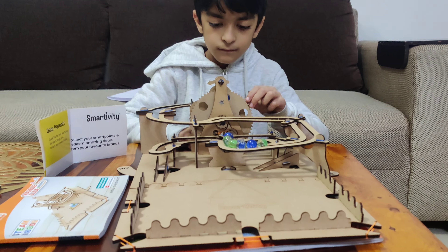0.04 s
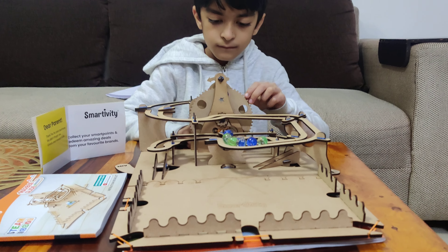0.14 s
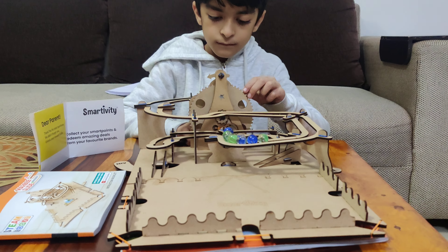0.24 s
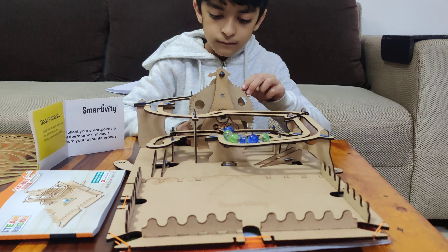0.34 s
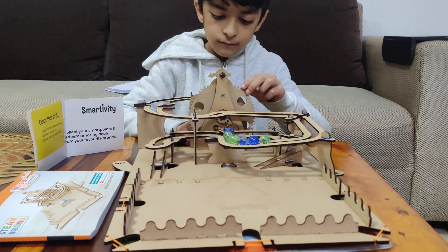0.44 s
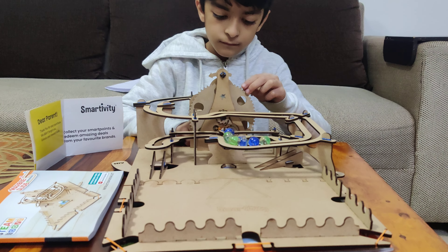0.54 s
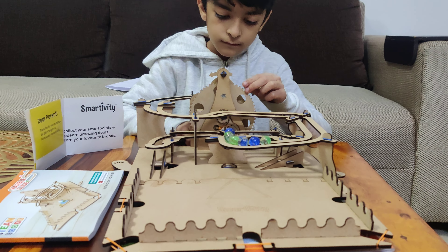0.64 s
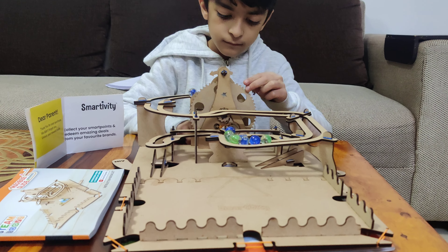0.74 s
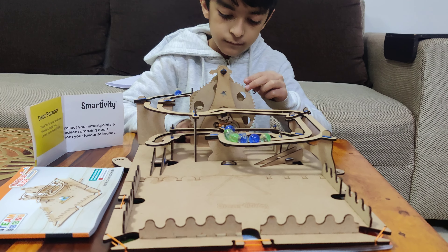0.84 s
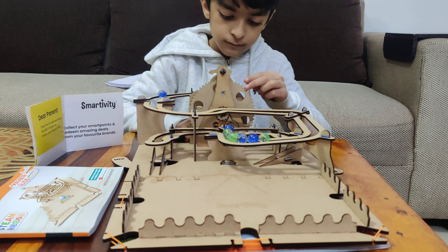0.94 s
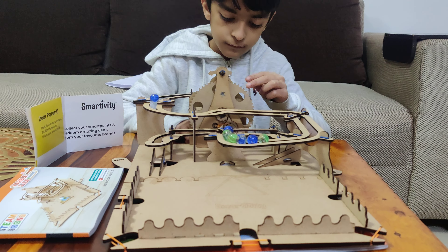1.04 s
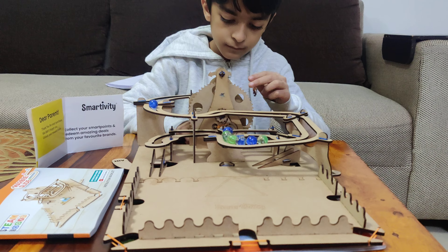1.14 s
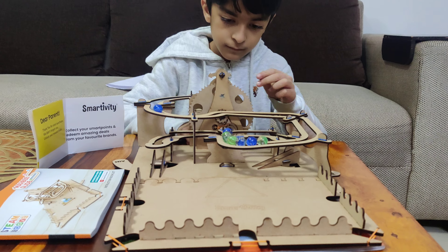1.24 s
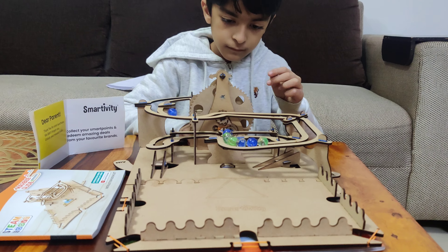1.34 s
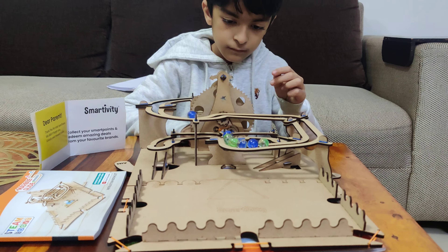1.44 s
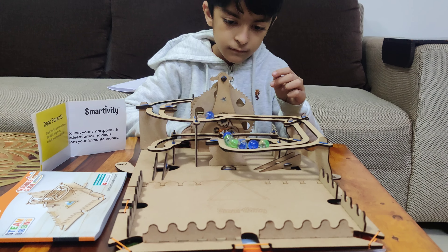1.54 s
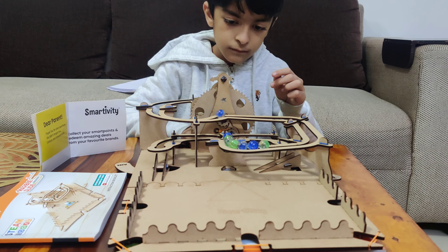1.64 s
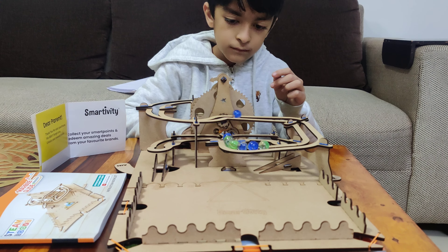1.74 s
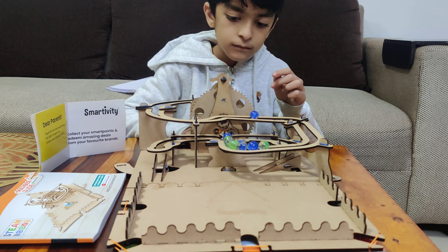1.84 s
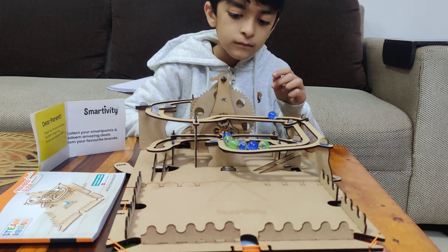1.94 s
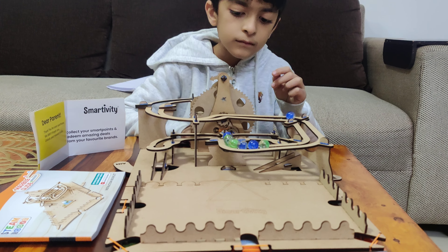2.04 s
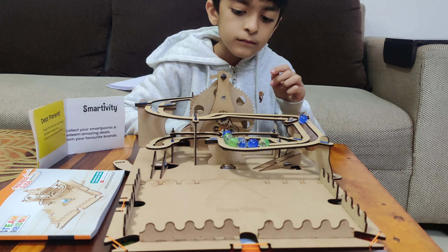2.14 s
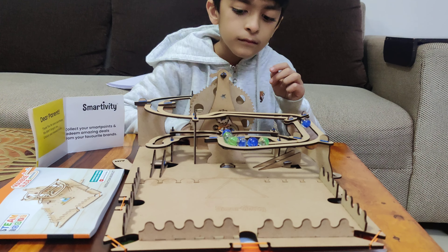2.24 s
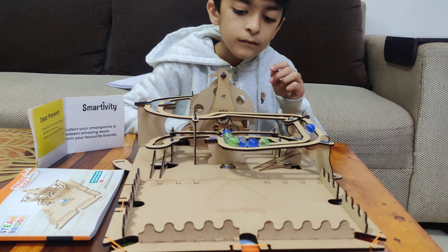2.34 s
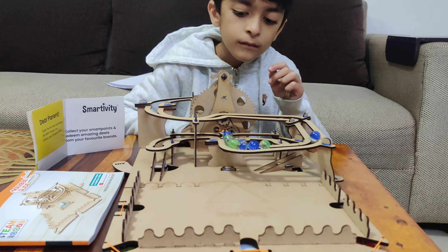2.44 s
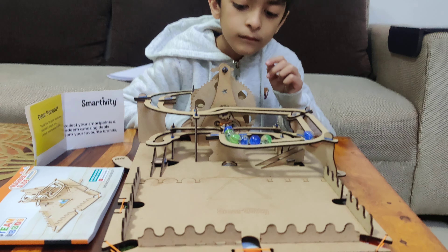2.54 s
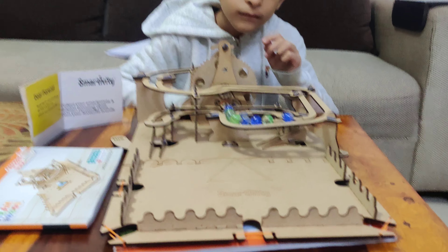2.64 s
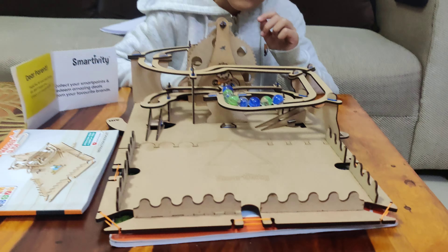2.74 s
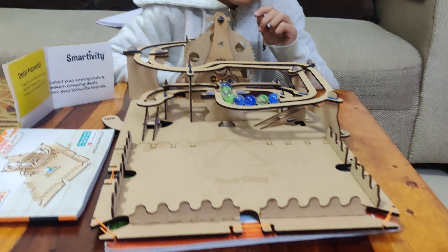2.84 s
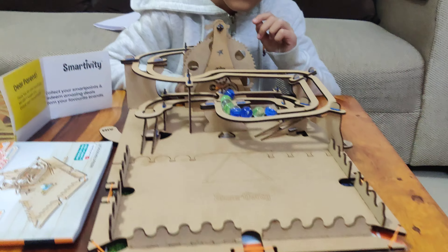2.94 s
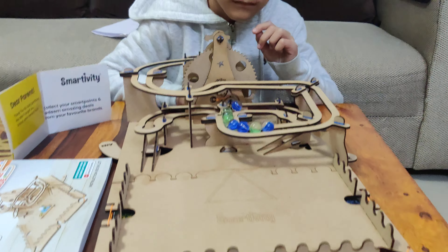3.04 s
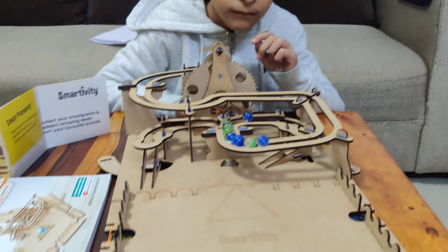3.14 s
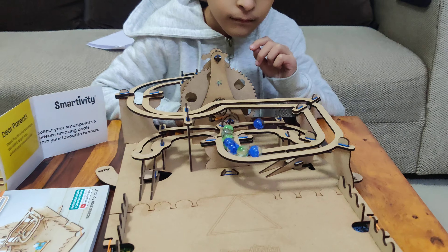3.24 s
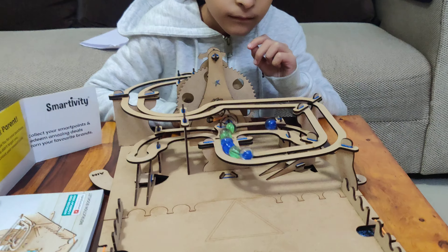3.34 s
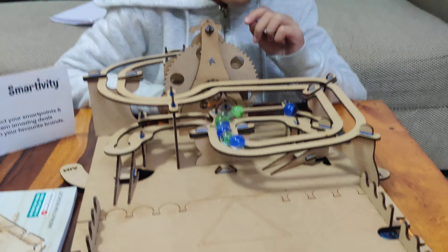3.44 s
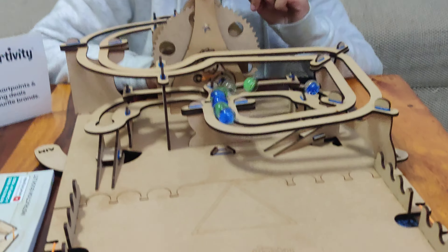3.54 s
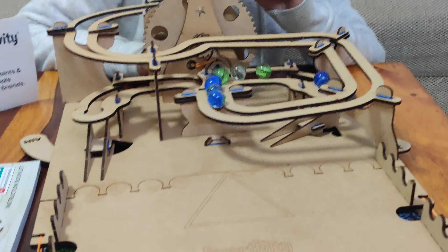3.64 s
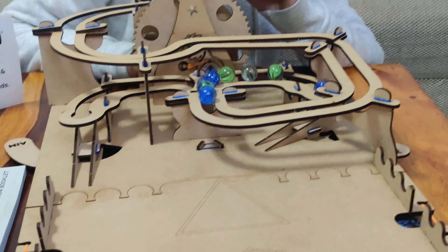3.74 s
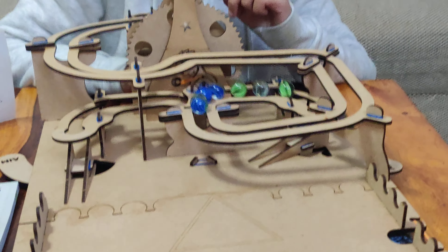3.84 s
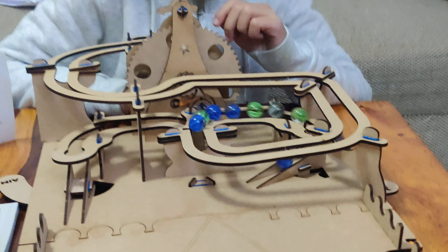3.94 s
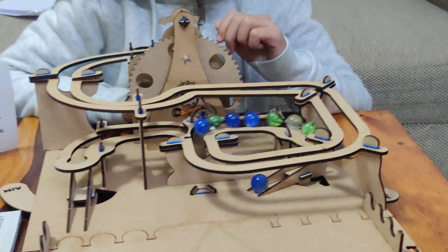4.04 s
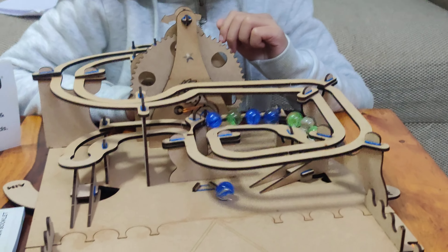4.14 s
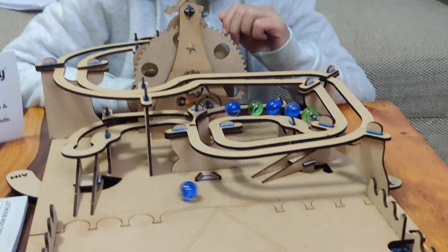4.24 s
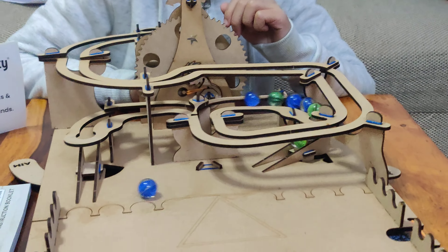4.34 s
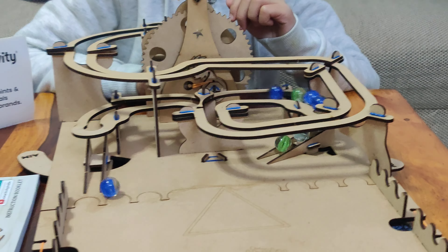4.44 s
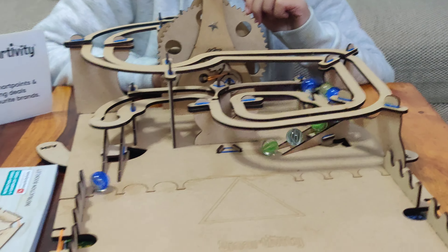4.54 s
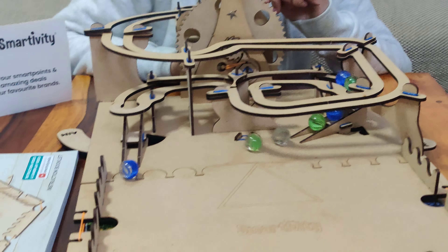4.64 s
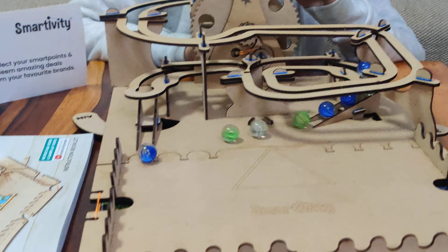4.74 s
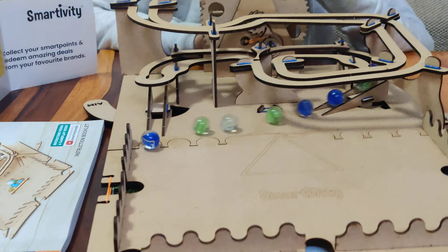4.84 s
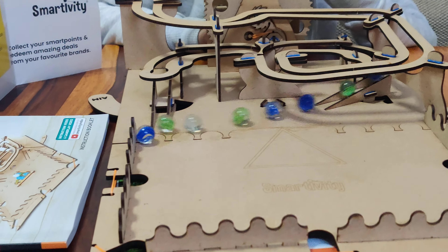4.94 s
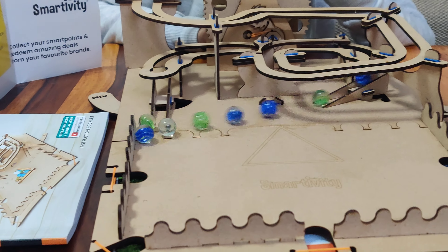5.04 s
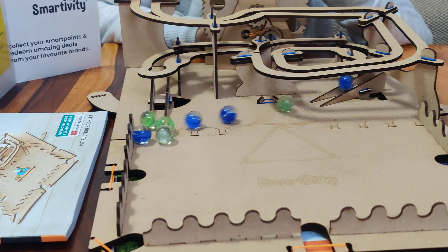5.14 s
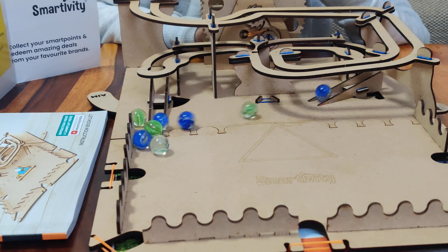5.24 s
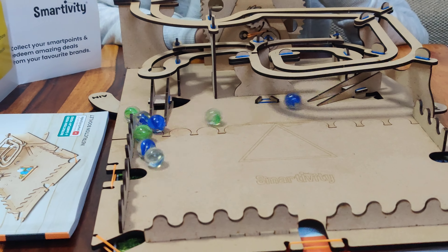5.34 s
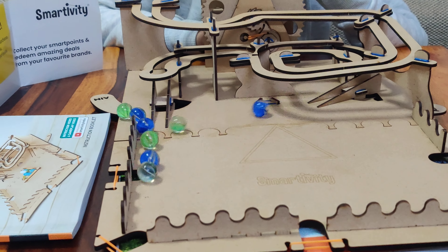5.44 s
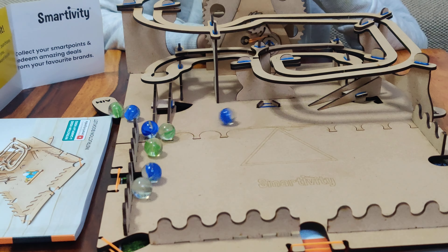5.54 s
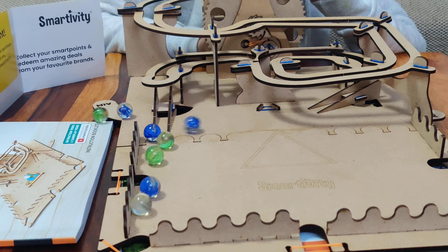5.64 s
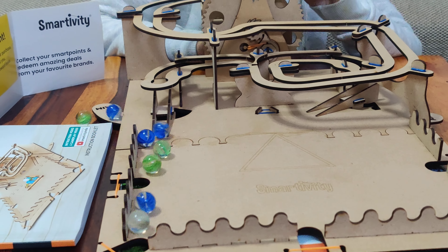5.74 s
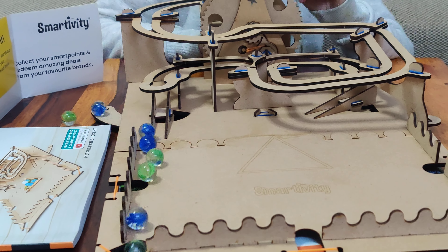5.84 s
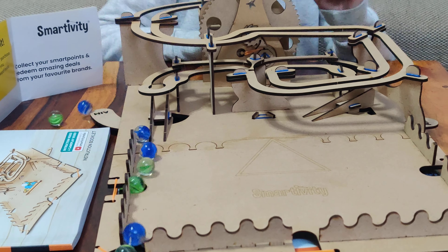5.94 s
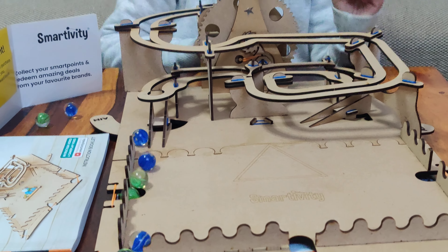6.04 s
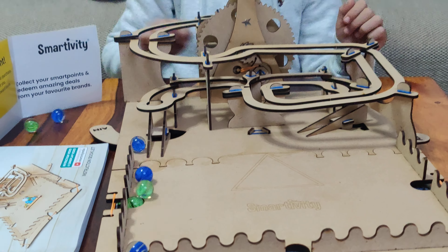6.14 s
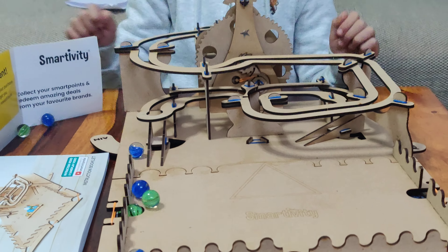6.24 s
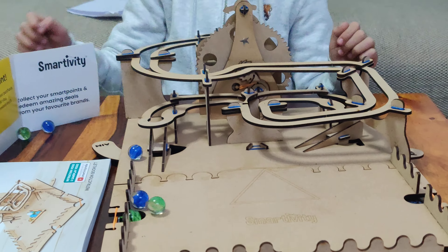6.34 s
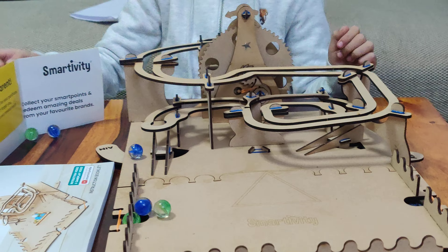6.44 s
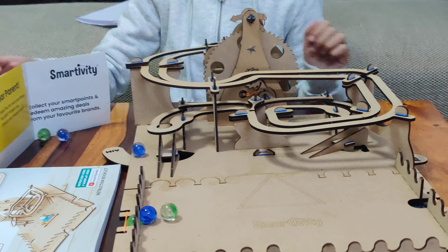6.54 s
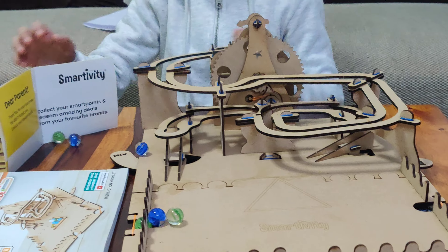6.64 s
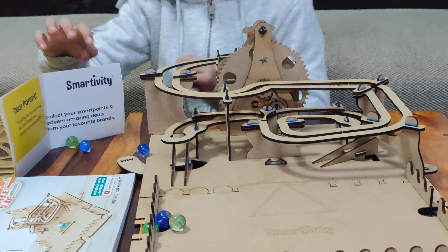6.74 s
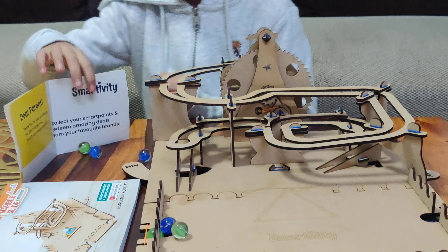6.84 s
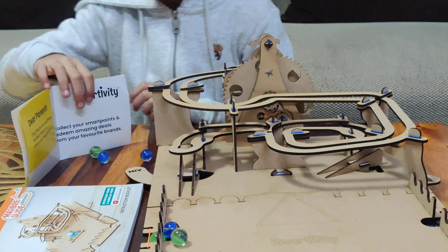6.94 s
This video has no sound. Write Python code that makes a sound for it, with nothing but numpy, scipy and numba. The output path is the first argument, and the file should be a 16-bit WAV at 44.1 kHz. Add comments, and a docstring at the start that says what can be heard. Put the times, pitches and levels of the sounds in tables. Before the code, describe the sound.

Quiet marble rolling on a wooden toy run builds into loud drops, rattling and glassy clicks on a tray, ending with spilled marbles bouncing on a tabletop.

```python
"""Wooden marble run

A lever knocks, one glass marble rolls down the rails and frees a queue of others. They drop one by one
onto a thin fibreboard tray, roll across it and click together; a few knock its edge and spill onto the table.
Every contact is a short ring of the struck body: a crowd of damped modes, on some bodies with single modes.
Rolling is random tiny bumps through such rings, louder with speed. A living room answers over a quiet hush.
"""
import sys
import numpy as np
from scipy import signal
from scipy.fft import rfft, irfft
from scipy.io import wavfile
from scipy.ndimage import uniform_filter1d
from numba import njit

SR = 44100
rng = np.random.default_rng(int(sys.argv[2]) if len(sys.argv) > 2 else 0)


def waveform_to_disk(signal):
    """Save audio, clipped to [-1, 1], as 16-bit WAV at the path in sys.argv[1]."""
    frames = np.transpose(np.atleast_2d(signal))
    scaled = np.clip(frames, -1, 1) * 32767
    samples = np.round(scaled).astype(np.int16)
    wavfile.write(sys.argv[1], SR, samples)


N = 308259
TIME = np.arange(N) / SR
TOP_HZ = 16200
BRAKE_S = 0.12  # a bend or a wall takes the speed away in this time
ENTER_S = 0.062  # a marble settles into rolling in this time

# In all tables: hit level = first 4 ms, before the mix; colour levels = relative spectrum of a body.
# rolling on rails and table top: [f/Hz, level/dB]
HARD_ROLL_COLOUR = [(168, -4), (280, -11), (400, -11), (580, -12.5), (1000, 0), (1350, -6), (2600, -0.5),
                    (4200, -17.5), (5300, -9), (6700, -26), (14000, -45.5)]


def undb(db):
    """Decibels to gain."""
    return 10 ** (np.asarray(db) / 20)


def unit(x):
    """Scale to an rms of 1."""
    return x / np.sqrt(np.mean(x ** 2))


def unit_energy(x):
    """Scale a response to a mean energy of 1 per channel."""
    return unit(x) / np.sqrt(x.shape[-1])


def on_log_axis(points, hz):
    """Interpolate (f/Hz, value) points over log frequency."""
    at_hz, value = np.transpose(points)
    return np.interp(np.log(hz + 1), np.log(at_hz), value)


def band(x, lo_hz, hi_hz, order=2):
    """Butterworth band-pass."""
    return signal.sosfilt(signal.butter(order, [lo_hz, hi_hz], "band", fs=SR, output="sos"), x)


def convolve(x, response):
    """Filter by a response, keeping the length."""
    return signal.fftconvolve(np.atleast_2d(x), np.atleast_2d(response), axes=1)[:, :x.shape[-1]]


def hardness(hz, tilt_db):
    """A harder, shorter contact feeds more treble: dB at each frequency from a tilt in dB/octave."""
    return tilt_db * np.log2(np.clip(hz, 900, 12000) / 2500)


def colour(x, points, tilt_db=0, size=2048):
    """Minimum-phase filter with the given spectrum, tilted in dB/octave, falling below its first point."""
    hz = np.arange(size // 2 + 1) * SR / size
    db = on_log_axis(points, hz) + hardness(hz, tilt_db)
    below = np.minimum((hz + 10) / points[0][0], 1) ** 4
    # fold the cepstrum onto positive times: a causal response
    cepstrum = irfft(np.log(undb(db) * below))
    cepstrum[1:size // 2] *= 2
    cepstrum[size // 2 + 1:] = 0
    return convolve(x, irfft(np.exp(rfft(cepstrum))))


def two_ears(size, alike_hz):
    """Stereo noise: alike on both sides well below alike_hz, unrelated well above."""
    mid, side = rfft(rng.standard_normal((2, size)))
    likeness = 1 / (1 + (np.arange(len(mid)) * SR / size / alike_hz) ** 4)
    mid = mid * np.sqrt(1 + likeness)
    side = side * np.sqrt(1 - likeness)
    return irfft(np.array([mid + side, mid - side]), size)


def crowd(t60, alike_hz, size=4096):
    """Countless damped modes: noise that builds as waves cross the body, dies fast, broadly flat in spectrum."""
    t = np.arange(size) / SR
    build = 1 - np.exp(-t / (.03 * t60))
    decay = np.exp(-np.log(1000) * t / t60)
    burst = rfft(two_ears(size, alike_hz) * build * decay)
    broad = uniform_filter1d(np.mean(abs(burst) ** 2, axis=0), size=128)
    fade = (1 - t / t[-1]) ** 2
    return unit_energy(irfft(burst / np.sqrt(broad), size) * fade)


def ring(modes, tilt_db, alike_hz, size=4096):
    """Single damped modes; weights and pitches vary at random with the spot that is struck."""
    hz, db, t60 = np.transpose(modes)[:, :, None]
    t = np.arange(size) / SR
    weight, detune, lag = rng.standard_normal((3, len(modes), 1))
    decay = np.exp(-np.log(1000) * t / t60)
    swing = undb(db + 5 * weight + hardness(hz, tilt_db)) / np.sqrt(t60) * decay
    phase = 2 * np.pi * hz * (1 + .025 * detune) * t
    apart = lag * np.minimum((hz / alike_hz) ** 2, 2) / 2
    sides = [(swing * np.sin(phase + side * apart)).sum(axis=0) for side in (1, -1)]
    return unit_energy(np.array(sides))


def add(track, sound, s):
    """Mix a sound into a track at time s."""
    start = int(np.clip(s * SR, 0, N - 1))
    track[:, start:start + sound.shape[1]] += sound[:, :N - start]


def strikes(hits, points, t60, alike_hz, modes=None, modes_db=0, size=176):
    """Blows (t/s, level/dB, tilt/dB per octave) on one body: part of the ring is common, part new each time."""
    out = np.zeros((2, N))
    own = crowd(t60, alike_hz)
    for s, db, tilt_db in hits:
        blow = unit_energy(colour(0.9 * own + crowd(t60, alike_hz), points, tilt_db))
        if modes:
            blow = blow + undb(modes_db) * ring(modes, tilt_db, alike_hz)
        onset_rms = np.sqrt(np.mean(blow[:, :size] ** 2))  # first 4 ms
        add(out, blow * undb(db) / onset_rms, s)
    return out


def tilted(hits, tilt_db):
    """Give a set of blows one hardness of contact, in dB/octave."""
    return [(s, db, tilt_db) for s, db in hits]


def wander(rate):
    """Random levels held about 1 / rate s and smoothed, rms 1."""
    hold = int(SR / rate)
    levels = rng.standard_normal(2048)[np.arange(N) // hold % 2048]
    return unit(uniform_filter1d(levels, hold))


def rolling(hum_gain, crackle_gain, points, rate, spread_db, split_hz, lump_db, lump_rate, count=6):
    """Tiny bumps, rate a second per spot, shake the wood in lumps; the ring shifts as the marble travels."""
    wood = 0
    lumps = undb(lump_db * np.clip(wander(lump_rate), -2, 1.5))
    for spot in range(count):
        at = rng.random(N) < rate / SR
        size = undb(spread_db * np.minimum(rng.exponential(size=N), 3))
        bumps = at * rng.choice([-1, 1], N) * size
        nearness = (1 + np.cos(2 * np.pi * (2.3 * TIME + spot / count))) ** 2
        wood = wood + convolve(bumps * nearness * lumps, colour(crowd(0.027, 1600), points))
    hum = signal.sosfilt(signal.butter(4, split_hz, fs=SR, output="sos"), wood)
    crackle = band(wood, split_hz, TOP_HZ, order=4)
    return unit(hum) * hum_gain + unit(crackle) * crackle_gain


def speed(start, end, entry, slow_s):
    """A marble speeds up steadily, then slows to rest: share of its top speed."""
    return np.interp(TIME, [start, start + ENTER_S, end, end + slow_s], [0, entry, 1, 0])


def loudness(runs, slow_s, power):
    """Gain of rolling marbles: each a power of its speed, summed as energies."""
    energy = 0
    for start, end, entry, db, *_ in runs:
        energy = energy + (undb(db) * speed(start, end, entry, slow_s) ** power) ** 2
    return np.sqrt(energy)


def jostle(gain, rate, over_db, spread_db, tilt_db, count=120):
    """Chance knocks, about rate a second, centred over_db above a rolling gain: rows (s, dB, tilt)."""
    chance = rng.random((count, 3))
    times = np.cumsum(.3 + 1.4 * chance[:, 0]) / rate
    hits = []
    for s, (_, strength, hard) in zip(times, 2 * chance - 1):
        if s < TIME[-1] and gain[int(s * SR)] > 0:
            roll_db = 20 * np.log10(gain[int(s * SR)])
            hits.append((s, roll_db + over_db + spread_db * strength, tilt_db + 3 * hard))
    return hits


def bounces(s, flight_s, kept, db, fade_db, count=16):
    """Each flight is shorter by the same share, so hops shrink into a buzz, softer and duller: (s, dB, tilt)."""
    hops = []
    for k in range(count):
        hops.append((s, db - fade_db * k, 2 - 0.22 * k))  # tilt in dB/octave
        s += flight_s * kept ** k
    return [hop for hop in hops if hop[0] < TIME[-1]]


@njit
def moving_low_pass(x, edge_hz):
    """Two-pole state-variable low-pass whose edge moves every sample."""
    y, b, l = np.empty(len(x)), 0., 0.  # b, l: band and low states
    for i in range(len(x)):
        g = np.tan(np.pi * edge_hz[i] / SR)
        v = (b + g * (x[i] - l)) / (1 + g * (g + 1))
        y[i] = l + g * v
        b, l = 2 * v - b, 2 * y[i] - l
    return y


def hush():
    """Low rumble and faint hiss of the quiet room: stereo noise with a fixed spectrum."""
    # relative density: [f/Hz, level/dB per Hz]
    hush_density = [(25, -7.5), (60, 0.5), (125, -13.5), (340, -17), (960, -28), (2900, -31.5), (4100, -43),
                    (5200, -33.5), (6500, -42.5), (15500, -40.5)]
    hz = np.arange(N // 2 + 1) * SR / N
    noise = irfft(rfft(two_ears(N, 380)) * undb(on_log_axis(hush_density, hz)), N)
    return undb(-59) * unit(noise)


def lever():
    """The wooden release lever knocks and rebounds, softer each time: a dry clack around one damped mode."""
    # knocks on wood: [t/s, level/dB]
    lever_knocks = [(0.3422, -24), (0.3762, -27.5), (0.3932, -35)]
    # quickly damped modes: [f/Hz, level/dB]
    lever_body = [(170, -19), (300, -18), (520, -4.5), (850, -1.5), (1300, -7), (1650, -18), (5200, -34),
                  (15000, -47)]
    # nominal mode: [f/Hz, level/dB, t60/s]
    lever_mode = [(874, 0, .013)]
    rebound_dull_db = 3.5  # dB/octave per rebound
    hits = [(s, db, -rebound_dull_db * k) for k, (s, db) in enumerate(lever_knocks)]
    return strikes(hits, lever_body, t60=0.017, alike_hz=1940, modes=lever_mode, modes_db=0)


def rails():
    """Marbles roll down narrow rails, brighter with speed, each stretch at its pitch; ticks and joint knocks."""
    # stretches: [start/s, end/s, entry speed/share of final, final level/dB, resonance/Hz]
    stretches = [(0.572, 0.714, 0.25, -60, 900), (0.77, 1.125, 0.47, -56.5, 1940),
                 (1.234, 1.552, 1, -55.5, 1580), (1.606, 2.174, 0.41, -59.5, 1130),
                 (2.25, 2.936, 1, -66.5, 850), (3, 3.88, 0.14, -65.5, 1900)]
    # knocks at bends and joints: [t/s, level/dB]
    joint_knocks = [(1.2065, -33), (2.2195, -35.5), (2.2573, -49), (3.238, -42.5), (3.4112, -41),
                    (3.5585, -41), (3.583, -33.5), (3.6844, -37.5), (3.8059, -35.5)]
    # light, dry ticks of the thin rails: [t/s, level/dB]
    thin_ticks = [(1.5135, -46), (1.542, -41.5), (1.732, -48.5), (2.058, -45.5), (2.8832, -42),
                  (3.0825, -52.5), (3.1102, -41), (3.4748, -43), (3.6344, -40.5), (3.745, -46.5),
                  (3.7694, -38.5)]
    # quickly damped modes: [f/Hz, level/dB]
    rail_body = [(150, -17), (500, -4.5), (1000, 3.5), (1800, 1.5), (2700, 0.5), (3900, -11.5), (5300, -4),
                 (7000, -19.5), (10000, -26), (15000, -42)]
    slow_edge_hz, fast_edge_hz = 1000, 6440  # low-pass edge at rest and at full speed
    ring_db, ring_ratio = -0.5, 1.117  # stretch resonance: strength; edge to centre

    hum = loudness(stretches, BRAKE_S, power=0.16)
    crackle = undb(-4.5) * loudness(stretches, BRAKE_S, power=0.85)
    roll = rolling(hum, crackle, HARD_ROLL_COLOUR, rate=190, spread_db=5, split_hz=1174,
                   lump_db=2.5, lump_rate=55)
    paces = [speed(start, end, entry, BRAKE_S) for start, end, entry, *_ in stretches]
    rings = 0
    for pace, (*_, hz) in zip(paces, stretches):
        rings = rings + np.sqrt(pace) * band(roll, hz / ring_ratio, hz * ring_ratio, order=1)
    edge_hz = slow_edge_hz * (fast_edge_hz / slow_edge_hz) ** np.max(paces, axis=0)
    roll = np.array([moving_low_pass(side, edge_hz) for side in roll + undb(ring_db) * rings])

    grain = jostle(crackle, rate=26, over_db=-5.5, spread_db=10, tilt_db=0.5)
    last_stretch = loudness(stretches[-1:], BRAKE_S, power=0.93)
    queue = jostle(last_stretch, rate=26, over_db=9, spread_db=7.5, tilt_db=-1)
    knocks = strikes(tilted(joint_knocks, tilt_db=1.7), rail_body, t60=0.039, alike_hz=856)
    light = tilted(thin_ticks, tilt_db=-2) + grain + queue
    return roll + knocks + strikes(light, rail_body, t60=0.012, alike_hz=1510)


def hard_clicks():
    """Short, hard clicks with a broad hump, higher for a shorter contact."""
    # glass on glass, and marbles knocking the tray edge as they spill: [t/s, level/dB, hump/Hz]
    clicks = [(0.742, -57.5, 4940), (2.2192, -36.5, 5550), (2.784, -27, 10700), (3.1536, -58, 8140),
              (4.5072, -29, 5500), (4.6144, -20.5, 10100), (4.7093, -28, 5220), (4.8382, -21.5, 10880),
              (5.089, -17, 6800), (5.107, -25.5, 11200), (5.112, -18, 6200), (5.216, -27.5, 9700),
              (5.2847, -22.5, 7800), (5.2983, -26.5, 9700), (5.3924, -26.5, 10230), (5.412, -26.5, 5600),
              (5.423, -23, 6130), (5.5776, -17.5, 6060), (5.8064, -31.5, 9730), (5.8264, -21.5, 5400),
              (6.15, -35, 9530), (6.514, -51, 7800), (6.8564, -32.5, 5230)]
    # quickly damped modes: [f/Hz, level/dB]
    click_body = [(200, -13), (900, -1.5), (3700, -5), (5400, 1), (7500, -6.5), (12500, -7.5),
                  (16000, -15.5)]
    out = np.zeros((2, N))
    hz = np.geomspace(200, TOP_HZ, num=60)
    for s, db, contact_hz in clicks:
        hump_db = 11 * np.exp(-(np.log2(hz / contact_hz) / .45) ** 2)
        points = np.column_stack([hz, on_log_axis(click_body, hz) + hump_db])
        out += strikes([(s, db, 0)], points, t60=0.016, alike_hz=900)
    return out


def drumming():
    """The whole tray drums under the rolling weight: low narrow-band noise on a level curve."""
    # [t/s, level/dB]
    drum_curve = [(3.6, -62.5), (4.2, -52), (4.8, -53), (5.4, -43), (6.0, -51.5), (6.6, -53)]
    t, db = np.transpose(drum_curve)
    outside_s = np.maximum(t[0] - TIME, 0) + np.maximum(TIME - t[-1], 0)
    gain = undb(np.interp(TIME, t, db)) * np.exp(-outside_s / 0.022)
    return unit(band(rng.standard_normal(N), 44.6, 63.3)) * gain


def tray():
    """Marbles drop with equal force on the thin tray, roll over it, jostle and bump into its walls."""
    # drops: [t/s, tilt/dB per octave, roll level/dB]
    falls = [(3.8865, 2, -45), (4.2757, 4.5, -49), (4.4043, 3.5, -45.5), (4.5227, 4, -41),
             (4.6225, 3, -44.5), (4.7303, 3.5, -47), (4.8372, 7.5, -49), (4.9577, 4.5, -39.5)]
    # bumps into walls and joints: [t/s, level/dB]
    wall_bumps = [(3.938, -30), (3.9635, -29), (4.004, -34), (4.104, -24.5), (4.1472, -22), (4.2156, -24.5),
                  (4.338, -36), (4.3649, -31), (4.3898, -21.5), (4.4343, -25), (4.5945, -25), (4.6818, -30),
                  (4.7987, -28), (4.806, -23.5), (4.8561, -25), (4.9485, -27.5), (5.1796, -31),
                  (5.1901, -30), (5.262, -25.5), (5.3513, -22.5), (5.366, -31), (5.6616, -26.5),
                  (6.66, -52.5), (6.728, -53)]
    # late runs down the side: [start/s, end/s, entry speed/share of final, final level/dB]
    side_runs = [(5.88, 6.29, 0.48, -38.5)]
    # quickly damped modes: [f/Hz, level/dB]
    tray_body = [(150, -9), (500, -20), (730, 3.5), (1000, 5), (1130, -10), (1400, -3.5), (1850, 3.5),
                 (3300, -3.5), (4150, -6.5), (4900, 3), (6700, -9), (8700, -13), (16000, -38)]
    # nominal single modes: [f/Hz, level/dB, t60/s]
    tray_modes = [(715, -8, 0.066), (830, -7.5, .045), (953, 2, 0.046), (1794, 8, 0.034), (1924, 6, 0.035),
                  (2300, 8, 0.069), (5053, 8, 0.014)]
    # rolling: [f/Hz, level/dB]
    tray_roll = [(170, -16), (560, -17), (670, -4), (820, 2), (990, -1.5), (1200, -9.5), (1900, -6),
                 (4100, -14.5), (4950, -8), (7000, -28), (14000, -37)]
    drop_db = -11.5
    landing_speed, cross_s, settle_s = 0.94, 0.36, 0.71  # share of top speed; time to cross; time to rest

    crossings = [(s, s + cross_s, landing_speed, db) for s, _, db in falls]
    side = loudness(side_runs, BRAKE_S, power=0.43)
    hum = undb(-1.1) * loudness(crossings, settle_s, power=0.65) + undb(-1.0) * side
    crackle = undb(-4.5) * loudness(crossings, settle_s, power=1.6) + undb(-4.0) * side
    roll = rolling(hum, crackle, tray_roll, rate=110, spread_db=5.0, split_hz=1310, lump_db=2, lump_rate=40)
    hits = [(s, drop_db, tilt_db) for s, tilt_db, _ in falls] + tilted(wall_bumps, tilt_db=-0.9)
    knocks = strikes(hits, tray_body, t60=0.018, alike_hz=905, modes=tray_modes, modes_db=-7.0)
    chatter = jostle(crackle, rate=49, over_db=6.0, spread_db=5.5, tilt_db=-1.0, count=300)
    rattle = strikes(chatter, tray_body, t60=0.0074, alike_hz=914)
    return knocks + rattle + roll


def table():
    """Spilled marbles bounce on the solid table top and roll away."""
    # spills: [first landing/s, first flight/s, speed kept/share, level/dB, loss per bounce/dB]
    spills = [(5.8538, .0598, .758, -10, 1.65), (6.0502, .0603, .77, -11.3, 2.0),
              (6.9113, .0591, .76, -12, 1)]
    # rolling away: [start/s, end/s, entry speed/share of final, final level/dB]
    table_runs = [(6.3, 6.95, 0.95, -62.5)]
    # quickly damped modes: [f/Hz, level/dB]
    table_body = [(170, -8.5), (680, -11.5), (1050, 1), (1350, -6.5), (2450, 1.5), (3300, -2), (4200, -9.5),
                  (5300, 0.5), (6800, -19), (9500, -38.5), (16000, -62)]
    # nominal single modes: [f/Hz, level/dB, t60/s]
    table_modes = [(1057, -1.5, .06), (1590, 1.5, 0.076), (2340, 7, 0.045), (2730, 1.5, 0.042),
                   (3730, -4.5, 0.22), (4860, 4.5, 0.022)]
    hops = [hop for spill in spills for hop in bounces(*spill)]
    knocks = strikes(hops, table_body, t60=0.025, alike_hz=897, modes=table_modes, modes_db=-6.0)
    gain = loudness(table_runs, BRAKE_S, power=0.97)
    roll = rolling(gain, undb(-9.5) * gain, HARD_ROLL_COLOUR, rate=240, spread_db=6.0, split_hz=1020,
                   lump_db=-2.5, lump_rate=26)
    return knocks + roll


def room(x, size=32768):
    """Near surfaces echo, the walls answer with diffuse noise decaying at its own rate in each band."""
    # decay: [f/Hz, t60/s]
    decay_t60 = [(150, 0.75), (900, 0.32), (2500, 0.56), (5500, 0.47), (12000, 0.22)]
    # near surfaces: [delay/s, level/dB]
    near_echoes = [(0.0126, -4), (.0188, -9.5), (.026, -15.5)]
    t = np.arange(size) / SR
    hz, s, cells = signal.stft(two_ears(size, 850), SR, nperseg=256)
    fade = np.exp(-np.log(1000) * s / on_log_axis(decay_t60, hz)[:, None])
    diffuse = signal.istft(cells * fade, SR)[1][:, :size]
    tail = unit_energy(diffuse * (t > .011))  # gap before the diffuse sound, s
    for delay_s, db in near_echoes:
        add(tail, undb(db) * crowd(0.0034, 850), delay_s)
    tone = [(120, -10.5), (170, 6.5), (260, 4.5), (900, 3.0), (5500, -3.5), (15000, 0.5)]  # f/Hz, level/dB
    return convolve(x, unit_energy(colour(tail, tone)))


def scene():
    """Mix direct and room sound: the further a part is, the more room it carries."""
    # the first marble swings along the top rails, panning all direct sound: [t/s, left minus right/dB]
    swing_pan = [(1.7, -0.1), (2.3, -2.8), (3.1, 1.36)]
    # sound, direct level/dB, room level/dB
    parts = [(lever(), 0, -9.5), (rails(), -1, -3.5), (hard_clicks(), 0, -5.5),
             (tray(), -.5, -8.4), (table(), 0, -7.3)]
    direct = sum(x * undb(direct_db) for x, direct_db, _ in parts)
    send = sum(x * undb(room_db) for x, _, room_db in parts)
    # the table under everything hums at its main mode
    table_hum = undb(11.5) * band(send.mean(axis=0), 167.0, 168, order=1)
    pan_db = np.interp(TIME, *np.transpose(swing_pan))
    panned = direct * undb(np.array([pan_db, -pan_db]) / 2)
    return panned + room(send) + table_hum + drumming() + hush()


def record(dry):
    """The two microphones differ in colour; peaks clip and the top is cut."""
    # f/Hz, left minus right/dB
    balance = [(60, 2.4), (200, 1), (2500, 2.2), (5200, -2.8), (9000, 1.5), (14000, -.5)]
    balance_db = on_log_axis(balance, np.arange(N // 2 + 1) * SR / N)
    heard = irfft(rfft(dry) * undb(np.array([balance_db, -balance_db]) / 2), N)
    top_cut = signal.ellip(8, .2, 70, TOP_HZ, fs=SR, output="sos")
    return signal.sosfilt(top_cut, np.clip(heard, -1, 1))


dry = scene()
out = record(dry)
waveform_to_disk(out)
```